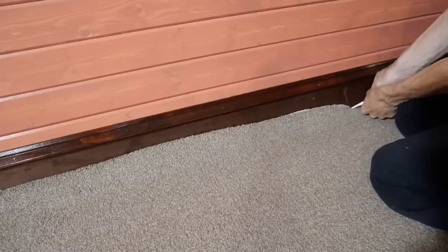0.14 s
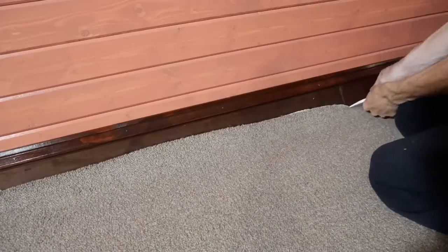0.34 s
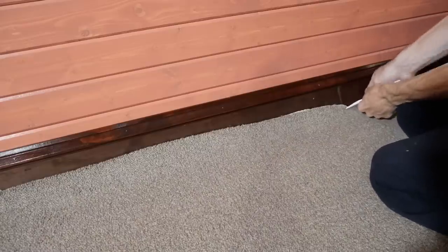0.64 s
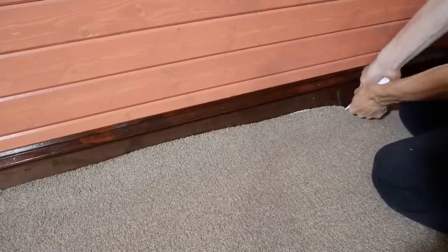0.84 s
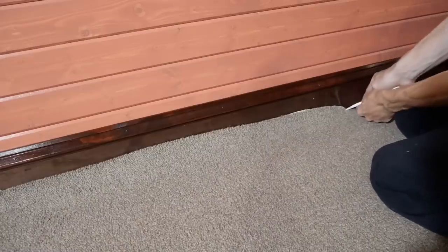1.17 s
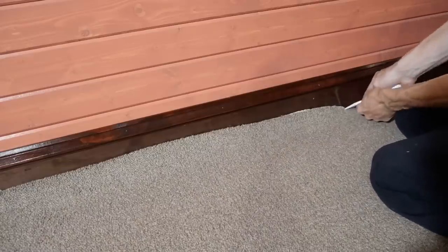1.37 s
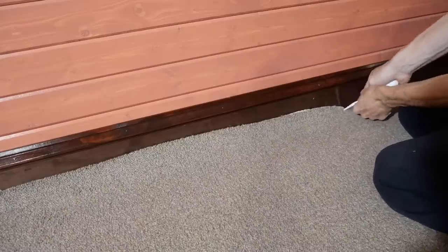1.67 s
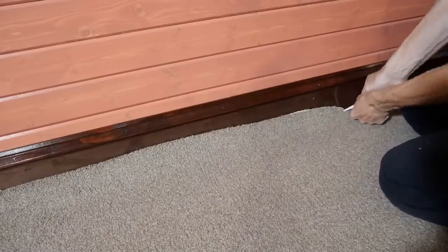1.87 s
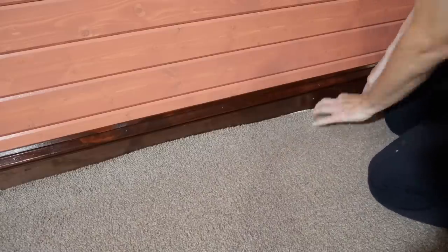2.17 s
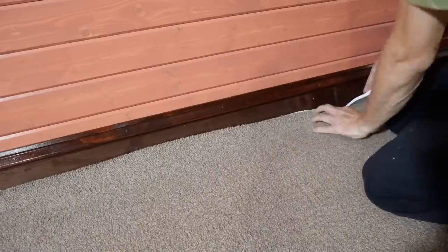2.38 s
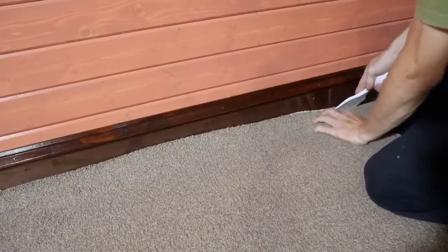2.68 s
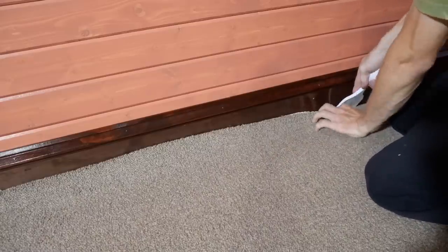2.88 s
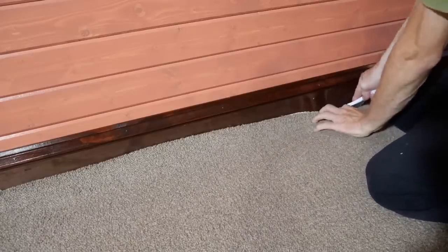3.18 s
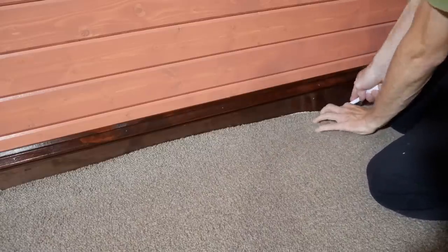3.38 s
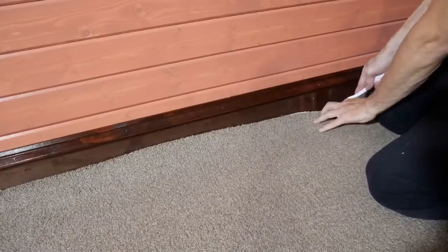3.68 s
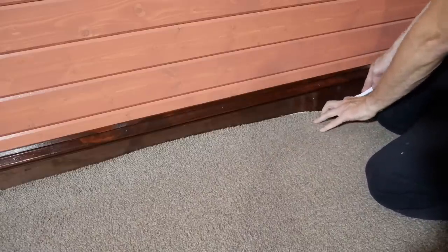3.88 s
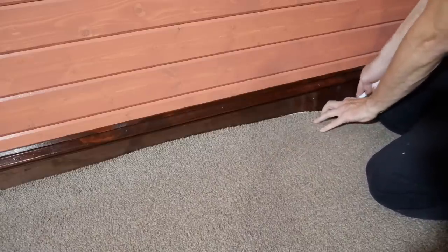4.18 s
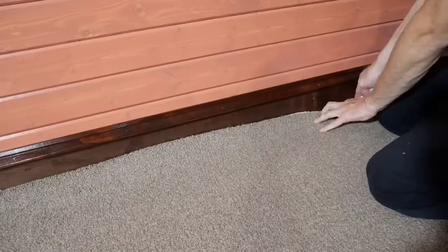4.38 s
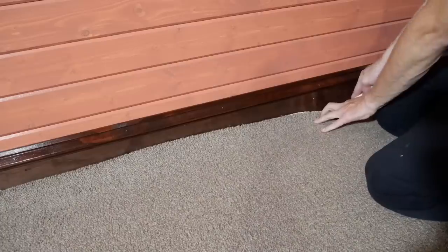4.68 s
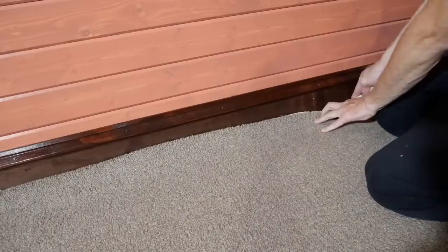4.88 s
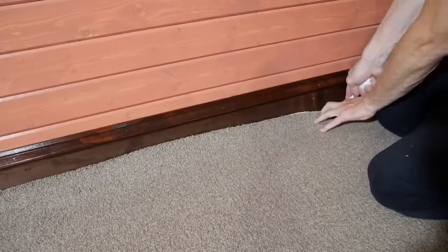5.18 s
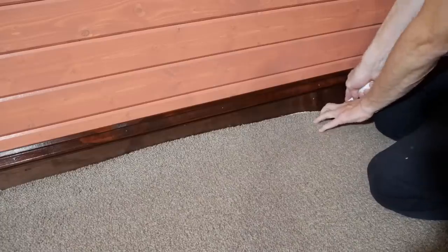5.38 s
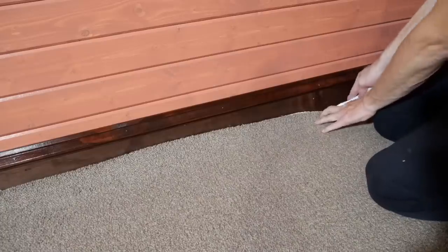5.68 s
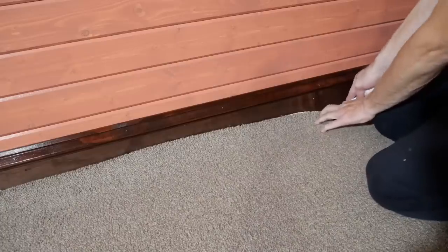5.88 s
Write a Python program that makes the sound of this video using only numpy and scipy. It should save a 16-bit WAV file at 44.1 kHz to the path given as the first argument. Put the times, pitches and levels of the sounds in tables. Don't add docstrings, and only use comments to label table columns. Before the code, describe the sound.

Soft wool rustles and drags past a metal blade, with dull wooden knocks, small clicks and brief fuzzy squeaks. The floor thumps very low as weight shifts around two seconds; a loud crisp tick cracks at 2.8. Then mostly quiet brushing, with short scrapes returning after four and five seconds. A small camera microphone hears it closely, slightly boxy, with little room echo and steady faint hiss.

```python
import sys
import numpy as np
from scipy import signal
from scipy.fft import rfft, irfft, next_fast_len
from scipy.io import wavfile
from scipy.ndimage import uniform_filter1d

SR = 44100
rng = np.random.default_rng(int(sys.argv[2]) if len(sys.argv) > 2 else 0)


def waveform_to_disk(signal):
    frames = np.transpose(np.atleast_2d(signal))
    scaled = np.clip(frames, -1, 1) * 32767
    samples = np.round(scaled).astype(np.int16)
    wavfile.write(sys.argv[1], SR, samples)


def ratio_of_db(decibels):
    return 10 ** (np.asarray(decibels, float) / 20)


N = 266501
TIME_S = np.arange(N) / SR
HIT_S = TIME_S[:SR // 10]
SHELL_HZ, SHELL_WIDTH_HZ, SHELL_DB = 1386, 192, 1.5


def evened(x):
    return x / np.sqrt(np.mean(x ** 2) + 1e-20)


def read(points, hz):
    f, value = np.transpose(points)
    return np.interp(np.log(hz + 1), np.log(f + 1), value)


def add(mix, s, sound):
    part = mix[round(s * SR):][:len(sound)]
    part += sound[:len(part)]


def coloured(x, points):
    size = next_fast_len(N)
    gain = ratio_of_db(read(points, np.fft.rfftfreq(size, 1 / SR)))
    return evened(irfft(rfft(x, size) * gain, size)[:N])


def resonate(x, hz, width_hz):
    turn = np.exp(2j * np.pi * np.cumsum(hz * np.ones(len(x))) / SR)
    r = np.exp(-np.pi * width_hz / SR)
    return 2 * (turn * signal.lfilter([1 - r], [1, -r], x / turn)).real


def ring(hz, t60_s):
    return np.sin(2 * np.pi * hz * HIT_S) * ratio_of_db(-60 * HIT_S / t60_s)


def effort(peak_s, length_s, db, rise):
    at_s = np.arange(0, N + 128, 128)[:, None] / SR
    u = (at_s - peak_s) / length_s
    gain = ratio_of_db(db - 8 * abs(np.where(u < 0, u / rise, u)) ** 1.35)
    return np.interp(TIME_S, at_s[:, 0], np.sqrt((gain ** 2).sum(axis=1)))


def room(x):
    # f/Hz, t60/s
    decay = [(150, 0.36), (500, 0.36), (2000, 0.098), (6000, 0.29), (12000, 0.028)]
    taps = np.zeros(SR // 2)
    at = np.arange(200, len(taps) - 20, 20)
    taps[at + rng.integers(0, 20, len(at))] = rng.choice([-1., 1.], len(at))
    hz, t, z = signal.stft(taps, SR, nperseg=128)
    tail = signal.istft(z * ratio_of_db(-60 * t / read(decay, hz)[:, None]), SR, nperseg=128)[1]
    return signal.fftconvolve(x, tail / np.linalg.norm(tail))[:N]


def air():
    # f/Hz, level/dB
    spectrum = [(25, -22), (55, -6), (114, -10.5), (331, -10), (758, -15.5), (1180, -16.5), (1330, -8.5),
                (1470, -12.5), (1640, -20), (1860, -17), (7860, -19.5), (15000, -21), (16500, -30.5)]
    return ratio_of_db(-56) * coloured(rng.standard_normal(N), spectrum)


def planks():
    # peak t/s, length/s, level/dB, f/Hz
    shifts = [(.005, 0.17, -52, 43), (.44, 0.11, -61, 41.8), (0.646, 0.029, -57.5, 43.6),
              (0.755, .06, -56, 45.9), (.92, 0.055, -51, 40.5), (1.08, 0.13, -45, 42.7),
              (1.49, 0.092, -55, 43.8), (1.738, 0.065, -49, 46.7), (1.807, .05, -50, 40),
              (2.032, 0.032, -38, 40.7), (2.085, 0.066, -36.5, 41.2), (2.17, .07, -43.5, 42.1),
              (2.277, 0.093, -39.5, 40.9), (2.48, .08, -47.5, 41.7), (2.67, .05, -54, 41.2),
              (2.826, 0.1, -55, 42.3), (3.06, 0.072, -56, 44), (3.354, 0.1, -49, 44.1),
              (3.59, .1, -61, 44.9), (3.8, .07, -58, 43.5), (3.97, 0.14, -60, 44.5),
              (4.129, 0.064, -45.5, 43.3), (4.291, 0.063, -46.5, 45.9), (4.487, 0.049, -57, 44.3),
              (4.646, 0.12, -55, 42.5), (4.844, 0.24, -59.5, 42.5), (5.162, 0.068, -45, 43.3),
              (5.5, .17, -54, 43.5), (5.95, 0.17, -56, 44.8)]
    s, length_s, db, hz = np.transpose(shifts)
    phase = 2 * np.pi * np.cumsum(np.interp(TIME_S, s, hz)) / SR
    return np.sqrt(2) * effort(s, length_s, db, rise=0.75) * np.sin(phase)


def knocks():
    # t/s, peak level/dB, f/Hz, t60/s
    pushes = [(0.077, -48, 308, 0.079), (0.301, -45, 337, 0.34), (0.676, -30.5, 274, 0.021),
              (0.8, -44, 175, 0.1), (0.834, -42, 213, 0.055), (0.864, -31, 220, 0.05),
              (1.739, -48, 302.3, 0.074), (2.109, -37, 233, 0.093), (2.266, -32, 250, 0.044),
              (2.509, -22.5, 201, 0.03), (2.626, -26.5, 190, 0.046), (2.637, -27, 179, 0.05),
              (2.7968, -20, 228, 0.043), (2.818, -33, 250, 0.065), (4.184, -38, 194, 0.043),
              (4.239, -34.5, 210, 0.056), (4.33, -37.5, 201, 0.065), (5.18, -36, 232, 0.081),
              (5.276, -39, 171, 0.094), (5.484, -37, 174.4, 0.031), (5.734, -32, 182.7, 0.065),
              (6.005, -37.5, 236, 0.046)]
    out = np.zeros(N)
    rise = 1 - np.exp(-HIT_S / 0.0019)
    for s, db, hz, t60_s in pushes:
        modes = ring(hz, t60_s) + 0.28 * ring(1.57 * hz, 0.84 * t60_s) + 0.13 * ring(3.32 * hz, 0.79 * t60_s)
        add(out, s + 0.00284, ratio_of_db(db + 0.5) * rise * modes)
    return signal.lfilter(*signal.butter(2, 120, "highpass", fs=SR), out)


def singing():
    # t/s, length/s, f/Hz, width/Hz, level/dB
    whistles = [(.075, .065, 2550, 110, -60), (.15, .065, 2570, 110, -60), (5.6, .035, 1430, 250, -49),
                (5.76, .03, 550, 450, -49), (5.16, .05, 480, 350, -52), (.115, .02, 3400, 180, -65),
                (0.176, 0.013, 3350, 250, -62), (0.198, 0.045, 4250, 200, -66),
                (1.82, .012, 3300, 300, -52), (.86, .04, 780, 300, -49), (.33, .05, 150, 40, -50),
                (2.121, 0.024, 420, 200, -43), (2.2, .03, 400, 150, -41), (2.275, 0.021, 563, 200, -45),
                (2.117, 0.028, 2350, 200, -50), (4.175, .03, 3670, 400, -57), (4.575, .04, 1420, 200, -50),
                (.878, 0.035, 3400, 800, -48), (1.769, 0.036, 3250, 300, -52),
                (1.776, 0.031, 3950, 300, -49.5), (2.166, 0.04, 3950, 140.4, -50.5),
                (2.168, 0.04, 545, 150, -43), (2.226, 0.06, 2270, 220, -49),
                (2.219, 0.041, 3970, 139.3, -48), (2.4, 0.018, 3730, 400, -56),
                (2.582, .018, 660, 180, -47), (2.64, 0.028, 665, 160, -44.5), (3.355, 0.04, 990, 600, -57),
                (3.664, 0.079, 3395, 496, -59), (3.834, .025, 5280, 300, -54),
                (5.318, 0.035, 3770, 1123, -40)]
    # t/s, length/s, start f/Hz, end f/Hz, level/dB
    slides = [
        (.225, 0.032, 2600, 2300, -58),
        (2.415, .035, 3950, 3600, -58.5),
        (2.24, 0.056, 3250, 3700, -53),
        (0.23, .03, 3100, 3550, -59),
        (2.22, 0.024, 4500, 3800, -62),
        (2.635, .025, 1550, 1380, -45),
        (2.3, .03, 1240, 1400, -50),
    ]
    out = np.zeros(N)
    rows = [(s, length_s, hz, hz, width_hz, db) for s, length_s, hz, width_hz, db in whistles]
    rows += [(s, length_s, hz, end_hz, 130, db) for s, length_s, hz, end_hz, db in slides]
    lead = 2000
    for s, length_s, hz, end_hz, width_hz, db in rows:
        z = rng.standard_normal(SR // 2)
        size = int(2 * length_s * SR)
        pitch_hz = np.interp(np.arange(len(z)), [lead, lead + size], [hz, end_hz])
        tone = resonate(resonate(z, pitch_hz, width_hz), pitch_hz, width_hz)
        tone = evened(tone / abs(signal.hilbert(tone)) ** 0.1)[lead:][:size]
        add(out, max(s - length_s, 0), ratio_of_db(db) * tone * np.hanning(len(tone)))
    return out


def ticks():
    # t/s, peak level/dB, steel spit level/dB,
    # wood level/dB, shell level/dB
    blade_ticks = [(0.6772, -39.5, 0, -8, 3), (0.866, -33, -3, -11, 4), (1.707, -40, -2, -17, 2),
                   (1.768, -39, -12, -16, -12), (1.8277, -31, -4, -16, -8), (1.9057, -36, -3, -13, -19),
                   (2.07, -35, -17, -10, 6), (2.388, -33.5, 0, -4, -3), (4.359, -35, -2, -20, -7),
                   (4.6434, -32.5, -16, -12.5, -11), (5.2914, -39, -15, -12, -2), (5.3118, -33, -13, -17, 3),
                   (5.367, -33, -18, -23, -14), (5.7371, -40.5, 3, -14, 7.5), (5.7417, -46, -9, -12, -8),
                   (2.79975, -8, -15, -15, -8),
        (2.8182, -16.5, 0, -8, 3),
        (2.8197, -14, -9, -13, -6),
        (1.8526, -28, -2, -21, -19),
        (2.6246, -24.5, -15, -5, -8),
        (2.9632, -27, -5, -15, -6),
        (4.3203, -35, 1, -19, -15),
    ]
    # t/s, peak level/dB
    slips = [(2.574, -33), (3.6065, -41), (3.685, -43), (3.729, -46), (3.8107, -35), (3.826, -42),
             (3.914, -39), (3.9756, -34), (3.9806, -37.5), (4.566, -34), (5.488, -40), (5.581, -32)]
    # t/s, peak level/dB
    rattles = [
        (2.7967, -36),
        (2.8042, -35),
        (2.8105, -37),
        (2.829, -33),
        (4.335, -41),
        (4.379, -38),
        (3.611, -37),
        (3.728, -42),
        (5.295, -33),
    ]
    # f/Hz, level/dB, t60/s
    board = [(221, -26, 0.066), (343, -1, 0.055), (659, 4, 0.015), (830, -4.5, 0.029), (2110, -0.5, 0.0067),
             (2900, -4, 0.0061), (3730, -10, 0.012)]
    out = np.zeros(N)
    steel = signal.butter(2, [6500, 14000], "bandpass", fs=SR)
    u = (HIT_S - .0003) * 2 * np.pi * 3900
    crack = -1.6 * np.sin(.76 * u) * np.exp(-u ** 2 / np.where(u < 0, 5, 11))
    body_rise = 1 - np.exp(-HIT_S / 0.00056)
    hits = [(s, db, -2, *mix_db) for s, db, *mix_db in blade_ticks]
    hits += [(s, db, -13, -17, -13.5, 2.5) for s, db in slips]
    hits += [(s, db, -2, -18, -25, -20) for s, db in rattles]
    for s, db, crack_db, spit_db, wood_db, shell_db in hits:
        z = rng.standard_normal(len(HIT_S))
        spit = 0.89 * signal.lfilter(*steel, z * ratio_of_db(spit_db - 60 * HIT_S / 0.0045))
        wood = sum(ratio_of_db(level_db) * ring(hz * (1 + 0.0063 * detune), t60_s)
                   for (hz, level_db, t60_s), detune in zip(board, z))
        shell = ring(SHELL_HZ * (1 + 0.026 * z[-1]), 0.014)
        body = ratio_of_db(wood_db) * wood + ratio_of_db(shell_db) * shell
        add(out, s + .0004, ratio_of_db(db) * (ratio_of_db(crack_db) * crack + spit + body * body_rise))
    return out


def fibres(per_s, spread_db, clump_db, clump_size):
    size = ratio_of_db(spread_db * np.minimum(rng.exponential(1, N), 4))
    size = size * (rng.random(N) < per_s / SR)
    clumps = uniform_filter1d(rng.standard_normal(N), clump_size)
    clumps = evened(uniform_filter1d(clumps, clump_size))
    return size * rng.choice([-1., 1.], N) * ratio_of_db(clump_db * clumps)


def strokes():
    # peak t/s, length/s, effort level/dB, edge
    # bite level/dB
    rubs = [(0.333, 0.046, -42.5, -4), (0.84, 0.078, -49.5, -0.5), (1.219, 0.048, -51.5, -4.5),
            (1.394, 0.054, -54.5, -3), (1.76, 0.085, -52.5, 0.5), (1.88, 0.19, -53, -0.5),
            (2.07, 0.065, -58, -4), (2.145, 0.055, -45.5, -7.5), (2.202, 0.13, -41.5, -4.5),
            (2.313, 0.1, -44.5, -5.5), (2.393, 0.045, -55, 8.5), (2.59, 0.055, -43.5, -3),
            (2.693, 0.044, -50, -15), (2.847, 0.12, -50, -2.5), (3.803, 0.095, -53.5, -2),
            (4.186, 0.05, -49, 0), (4.595, 0.067, -45, -2.5), (4.74, 0.048, -50.5, -3),
            (5.314, 0.04, -44, 2), (5.349, 0.017, -51, -0.5), (5.364, 0.013, -45, 1.5),
            (5.588, 0.015, -49, 0), (5.612, 0.03, -48, 0), (5.65, .025, -55, 0),
            (.15, 0.23, -56, -3), (.46, 0.042, -56, -1), (.684, 0.012, -56, -1), (.76, 0.018, -64, -1),
             (1.01, 0.097, -57.5, -7), (3.19, 0.083, -56.5, -3), (3.4, 0.17, -56, -5.5),
             (3.618, 0.023, -55, 2.5), (3.675, 0.077, -53.5, 2.5), (3.91, 0.032, -66, 1),
             (3.98, 0.012, -47, -3.5), (4.341, 0.031, -55, 1.5), (4.92, 0.11, -57, -3.5),
             (5.17, 0.11, -58.5, 2), (5.499, 0.079, -59, 2), (5.745, 0.024, -54.5, -2.5),
             (6.03, 0.086, -56, 0)]
    # peak t/s, length/s, level/dB
    presses = [(0.077, 0.11, -53), (0.327, 0.067, -48.5), (.692, 0.033, -55), (0.815, 0.023, -42.5),
               (0.852, 0.054, -40), (0.937, 0.16, -56), (1.206, 0.067, -53), (1.79, 0.064, -55),
               (1.86, 0.24, -51), (2.152, 0.051, -39), (2.213, 0.13, -39.5), (2.33, 0.11, -41),
               (2.56, .04, -47), (2.69, 0.19, -49.5), (2.83, 0.091, -51), (3.09, 0.2, -59),
               (3.385, 0.13, -53.5), (3.654, 0.15, -60.5), (3.789, 0.024, -56), (3.973, 0.038, -59),
               (4.218, 0.055, -49), (4.35, 0.031, -47.5), (4.546, .04, -49), (4.633, 0.059, -52),
               (4.938, 0.15, -64), (5.165, 0.07, -47.5), (5.29, 0.047, -48), (5.536, 0.096, -54),
               (5.752, 0.022, -47), (6.04, 0.096, -50.5)]
    # f/Hz, level/dB per Hz
    drag_spectrum = [(300, -35), (700, -3), (1000, -5), (1400, 0.5), (2000, -7), (3000, -11.5),
                     (6000, -30.5)]
    hiss_spectrum = [(1000, -63), (1700, -7.5), (3100, -4), (3810, -4), (4910, -7), (6560, -7), (8860, -14),
                     (14700, -19.5), (16000, -48)]
    rumble_spectrum = [(35, -28), (60, -9), (70, -12), (98, -4.5), (129, -6.5), (226, -0.5), (278, -5.5),
                       (511, -8), (1100, -12.5), (1430, -25.5), (2420, -120)]
    s, length_s, db, bite_db = np.transpose(rubs)
    drag = coloured(fibres(6000, spread_db=2.4, clump_db=1.7, clump_size=200), drag_spectrum)
    hiss = coloured(fibres(12000, spread_db=-0.5, clump_db=2.0, clump_size=250), hiss_spectrum)
    rumble = coloured(fibres(2500, spread_db=2.6, clump_db=2.2, clump_size=400), rumble_spectrum)
    drag = drag * effort(s, length_s, db - 4.5, rise=0.83)
    hiss = hiss * effort(s, length_s, db + bite_db - 0.3, rise=0.83)
    rumble = rumble * ratio_of_db(-2.5) * effort(*np.transpose(presses), rise=0.8)
    return drag + hiss + rumble


def scene():
    hits = ticks() + knocks()
    rub = strokes()
    rub = rub + ratio_of_db(SHELL_DB) * resonate(rub, SHELL_HZ, SHELL_WIDTH_HZ)
    mono = rub + singing() + hits + ratio_of_db(-18.5) * room(hits) + planks() + air()
    return np.array([mono, mono])


def blocks(frames, hold, spread):
    z = rng.standard_normal((frames, 32))
    z = z + hold * np.roll(z, 1, axis=0) + spread * np.roll(z, 1, axis=1)
    return np.repeat(evened(z), 32, axis=1)


def switch(x):
    return .5 + .5 * np.tanh(12 * x)


def band_limit(x):
    return signal.sosfilt(signal.butter(12, 16660, fs=SR, output="sos"), x)


def record(dry):
    # f/Hz, level/dB
    apart_spectrum = [(60, -31), (300, -20.5), (1000, -22), (4000, -16), (8000, -13), (8500, -5.5),
                      (15000, -5)]
    edge_bin, thin_bin, lead = 734, 384, 76
    n, k = np.arange(2048) + .5, np.arange(1024) + .5
    window = np.sin(np.pi * n / 2048)[:, None]
    basis = window * np.cos(np.pi / 1024 * np.outer(n + 512, k)) / np.sqrt(512)
    halves = np.pad(dry[0], (1024 + lead, 2048 - (N + lead) % 1024)).reshape(-1, 1024)
    frames = np.hstack([halves[:-1], halves[1:]])
    z = frames @ basis

    slope = np.diff(frames, axis=1) ** 2
    steady = switch(1 - slope.max(1) / slope.mean(1) / 130)[:, None]
    busy_db = 10 * np.log10((z[:, 30:thin_bin] ** 2).sum(1, keepdims=True) + 1e-12)
    busy = np.minimum((busy_db - np.median(busy_db)) / 12, 1.1)
    treble = k > thin_bin
    lost = treble * switch(blocks(len(z), .45, .4) + busy - .95)
    apart = switch(blocks(len(z), 0.73, 0.61) + np.where(treble, 1.26 * busy - .3, .6))
    apart = apart * (0.29 + 0.8 * steady)

    z = z * (k < edge_bin)
    grain = rng.choice([-2.5, -0.5, -0.5, 1.5, 0, -1, 0.5, 2.0], z.shape)
    side = z * grain * ratio_of_db(-4 * busy * ~treble) * apart * ratio_of_db(read(apart_spectrum, k * SR / 2048))
    mid = z * (1 - lost * steady)
    mid, side = (v @ basis.T for v in (mid, side))
    mid, side = ((v[1:, :1024] + v[:-1, 1024:]).ravel()[lead:][:N] for v in (mid, side))
    return band_limit(np.array([mid + side, mid - side]))


dry = scene()
out = record(dry)
waveform_to_disk(out)
```